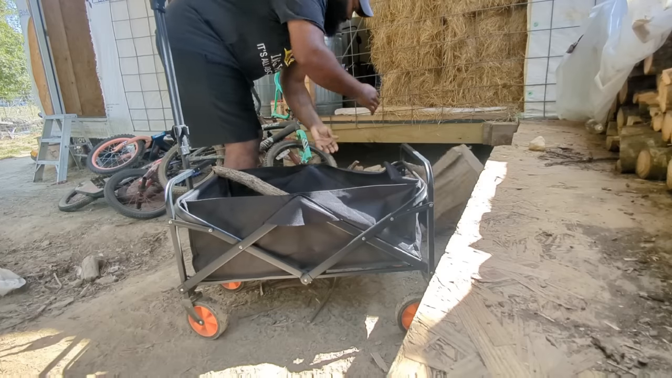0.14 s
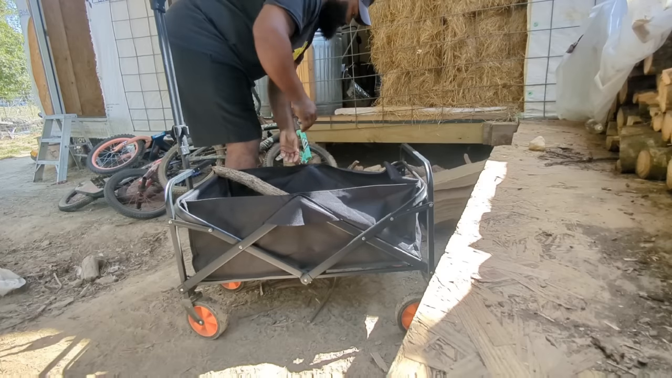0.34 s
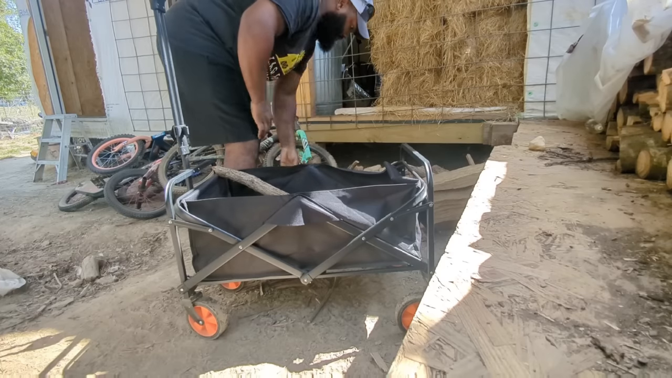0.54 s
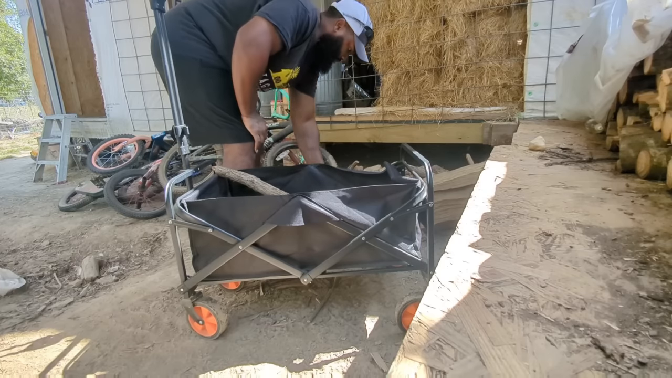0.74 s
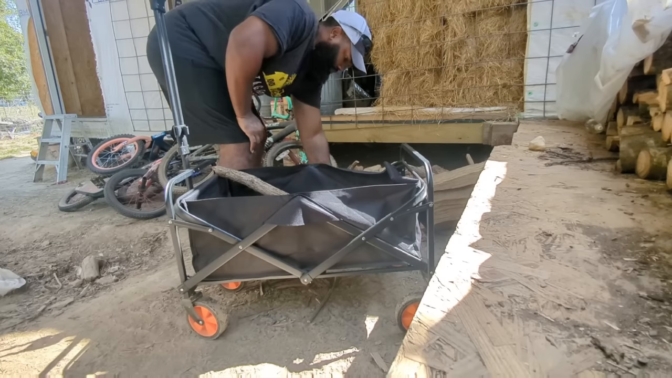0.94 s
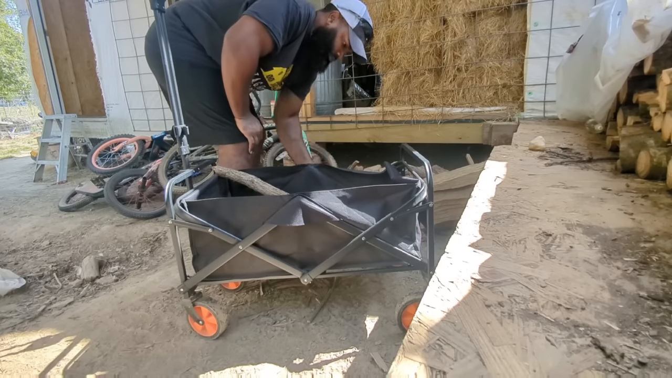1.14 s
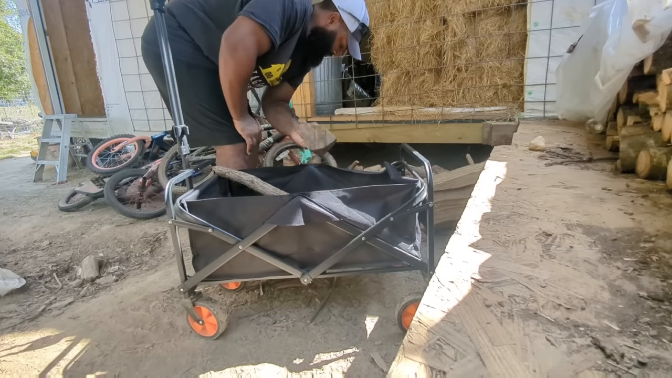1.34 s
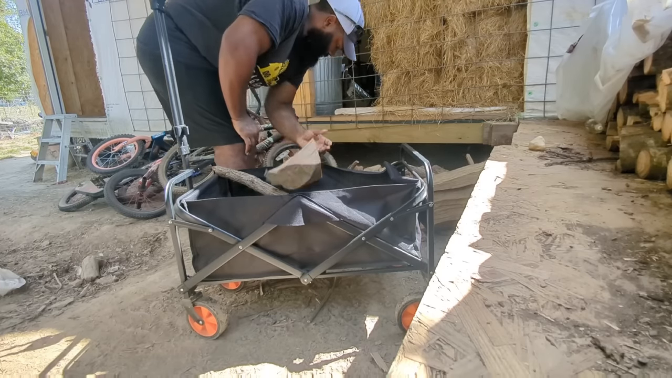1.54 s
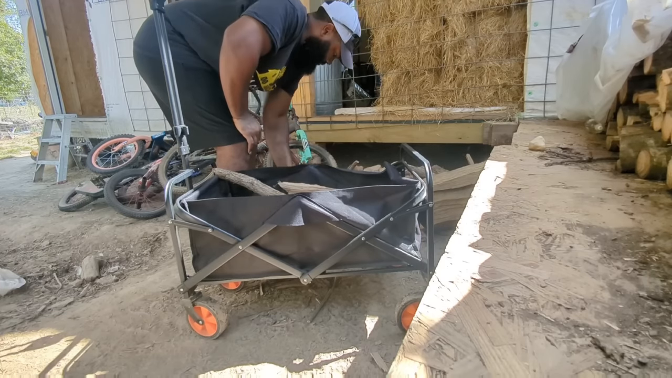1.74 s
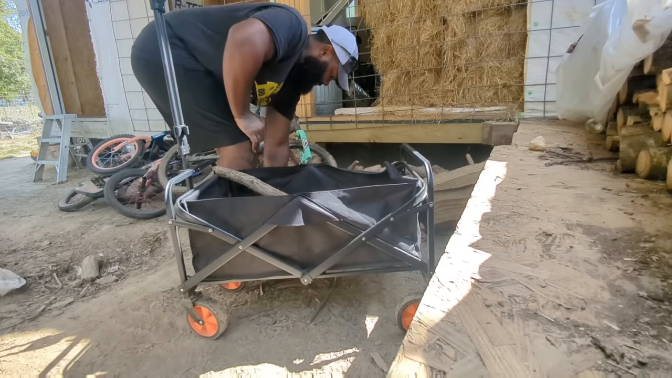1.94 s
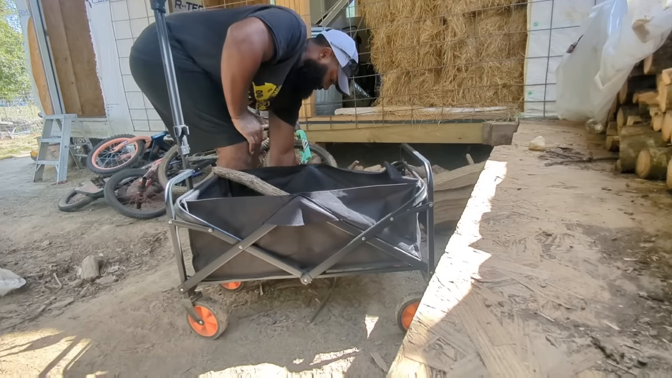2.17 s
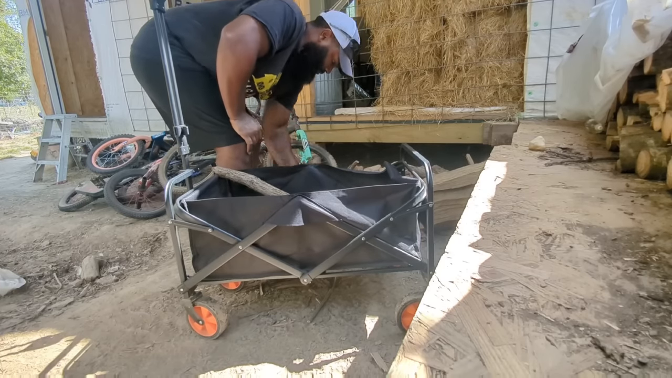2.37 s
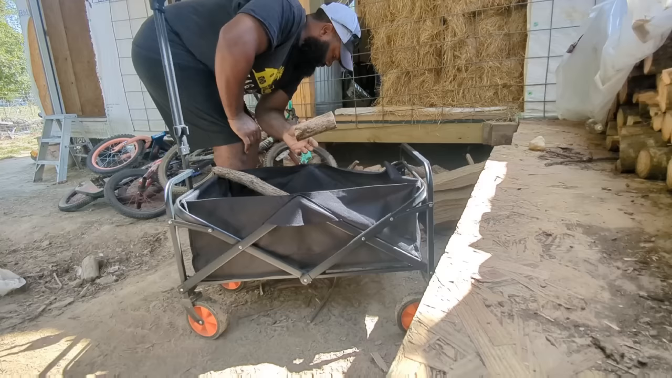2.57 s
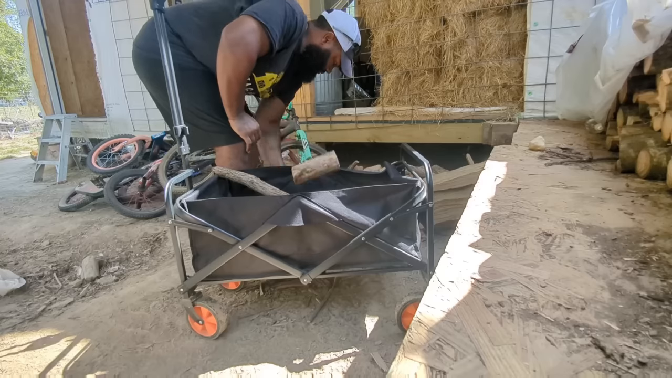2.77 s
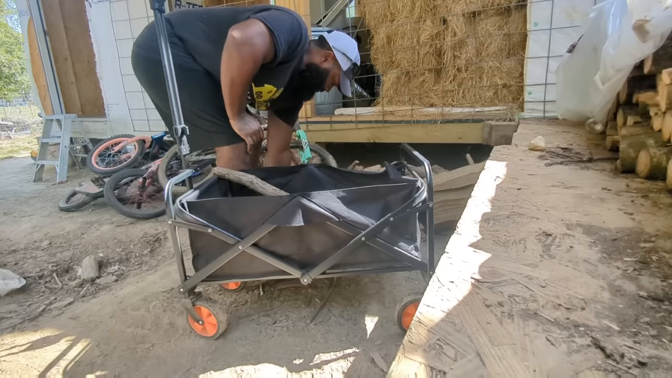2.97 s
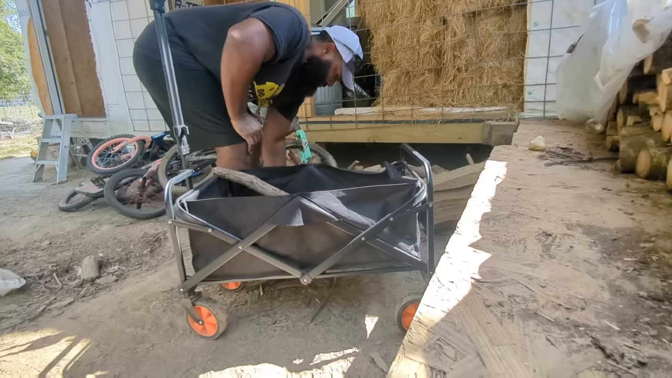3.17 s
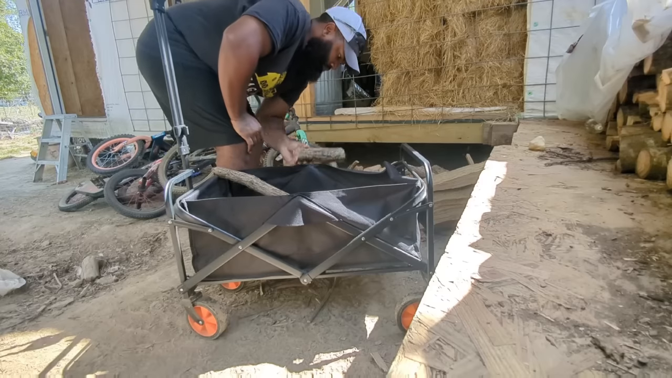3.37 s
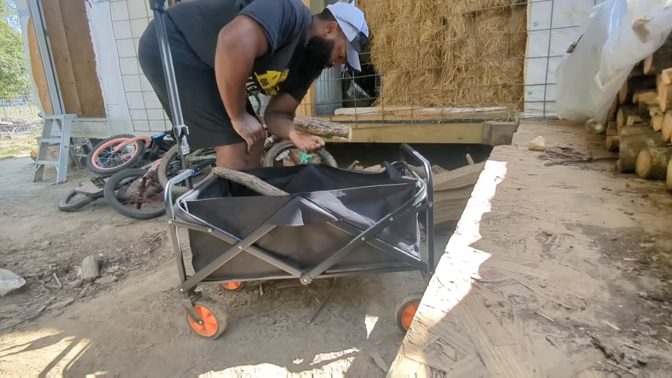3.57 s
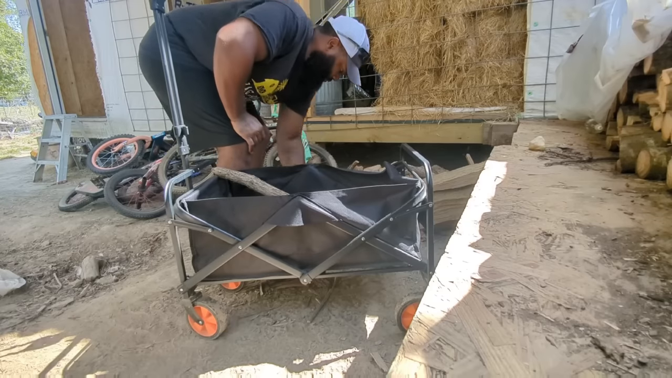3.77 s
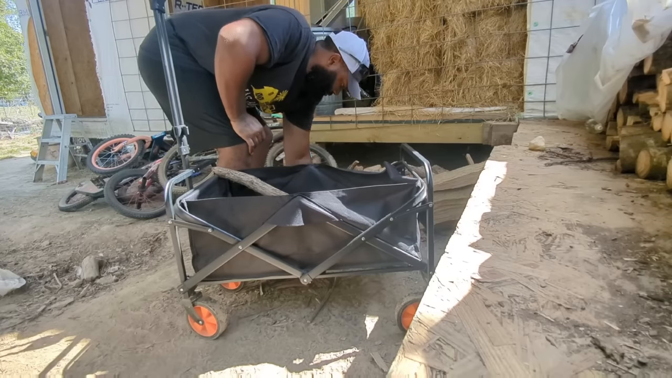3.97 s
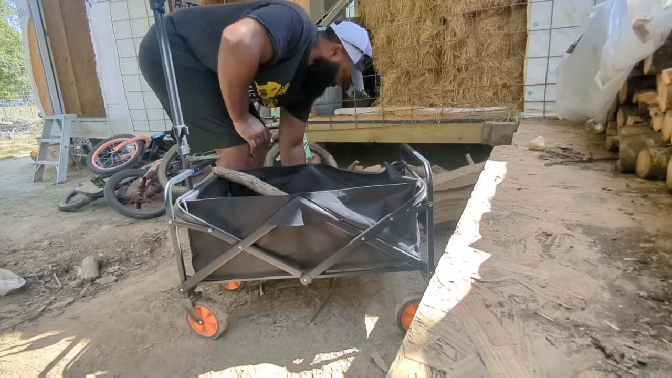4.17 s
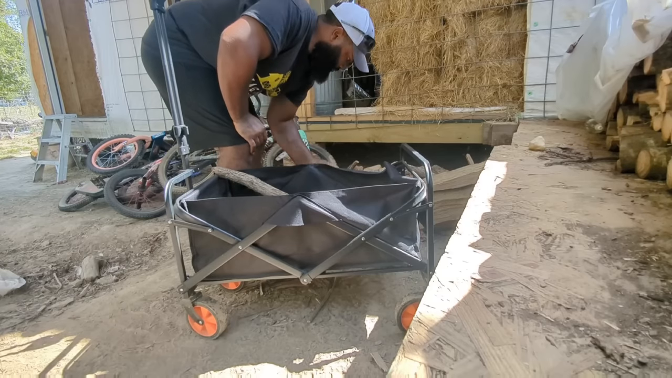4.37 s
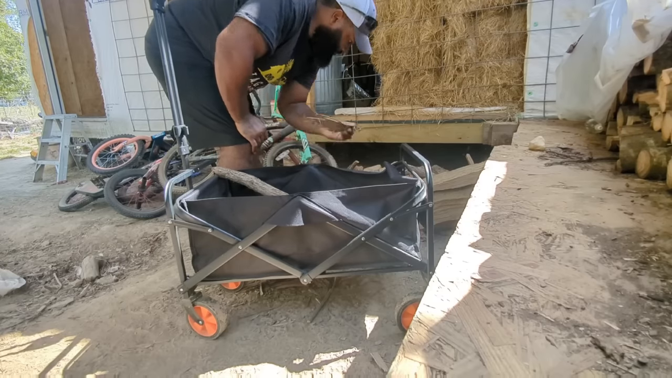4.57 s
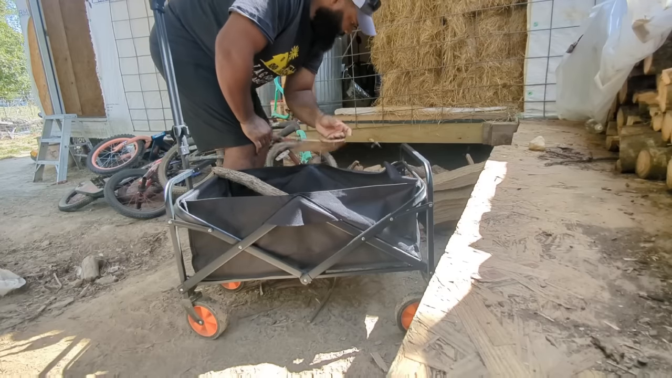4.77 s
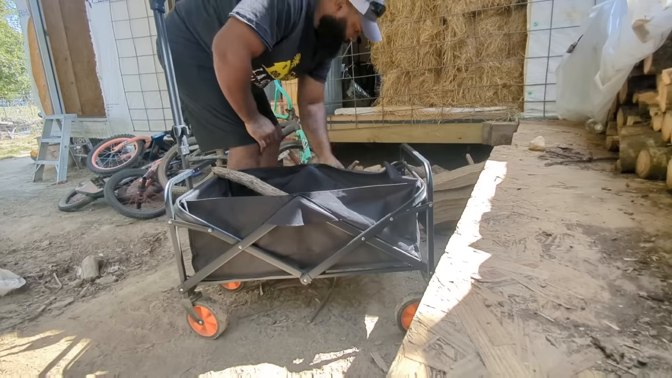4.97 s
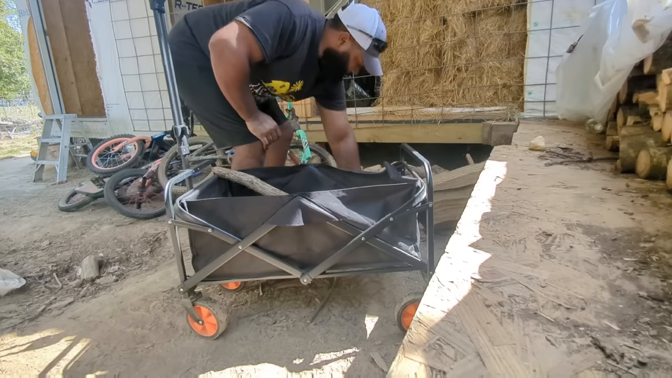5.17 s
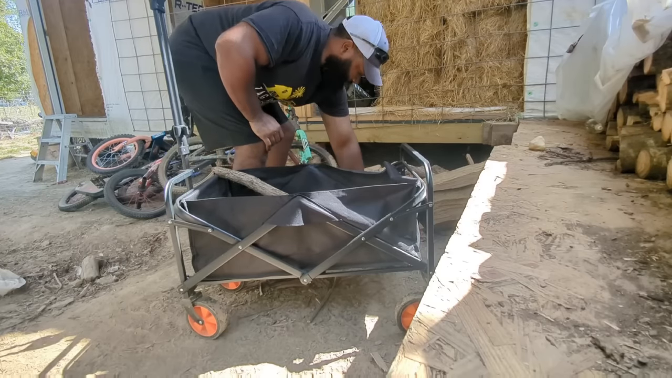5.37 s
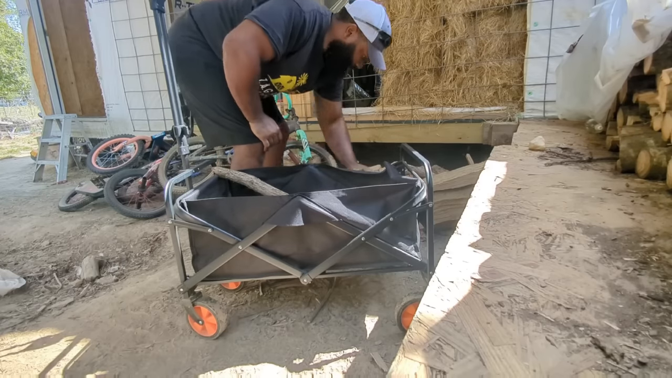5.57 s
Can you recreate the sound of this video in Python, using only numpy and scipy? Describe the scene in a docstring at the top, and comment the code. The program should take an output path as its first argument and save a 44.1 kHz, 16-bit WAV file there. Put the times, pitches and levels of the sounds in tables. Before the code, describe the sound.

Split firewood knocks, scrapes and thuds as it is dropped onto other logs outdoors, with faint birds behind.

```python
"""Split firewood is picked from a pile and dropped onto other logs in a yard, beside a folding wagon.
Each knock is a short chatter of contacts that rings the log and scatters between pile and walls.
Logs drag over each other, bark crunches, and heavy landings boom and sway the load.
A machine hums far off in still air and small birds call."""
import sys
import numpy as np
from scipy import signal
from scipy.fft import rfft, irfft
from scipy.io import wavfile
from scipy.ndimage import uniform_filter1d

SR = 44100
rng = np.random.default_rng(int(sys.argv[2]) if len(sys.argv) > 2 else 0)


def master_out(mix):
    """Clip the mix to full scale and print it as 16-bit PCM to the path in sys.argv[1]."""
    frames = np.transpose(np.atleast_2d(mix))
    ceiling = np.clip(frames, -1, 1)
    pcm = np.round(ceiling * 32767).astype(np.int16)
    wavfile.write(sys.argv[1], SR, pcm)


N = 247842
EVENT_N = SR // 2
EVENT_T = np.arange(EVENT_N) / SR


def amp(db):
    """dB to gain."""
    return 10 ** (np.asarray(db) / 20)


def lookup(table, hz):
    """Interpolates (f/Hz, value) rows over log frequency."""
    f, value = np.transpose(table)
    return np.interp(np.log(hz + 1), np.log(f + 1), value)


def unit_rms(x):
    """Scales to rms 1."""
    return x / np.sqrt(np.mean(x ** 2) + 1e-20)


def burst(x):
    """Scales to the energy of 30 ms at rms 1."""
    return unit_rms(x) * np.sqrt(.03 * SR / x.shape[-1])


def add(mix, start_s, sound):
    """Mixes a sound in at start_s."""
    part = mix[:, max(round(start_s * SR), 0):][:, :sound.shape[-1]]
    part += sound[..., :part.shape[-1]]


def band(x, low_hz, high_hz, order=2):
    """Causal band-pass."""
    return signal.sosfilt(signal.butter(order, [low_hz, high_hz], "band", fs=SR, output="sos"), x)


def convolve(x, response):
    """Per-channel convolution, cut to the input length."""
    return signal.fftconvolve(np.atleast_2d(x), np.atleast_2d(response), axes=1)[:, :x.shape[-1]]


def colour(x, spectrum, size=2048):
    """Minimum-phase filter from (f/Hz, gain/dB) rows."""
    gain_db = lookup(spectrum, abs(np.fft.fftfreq(size, 1 / SR)))
    log_gain = np.log(amp(np.maximum(gain_db, -100)))
    response = np.fft.ifft(np.exp(np.conj(signal.hilbert(log_gain)))).real
    return convolve(x, response)


# diffuse field: f/Hz, left-right coherence
COHERENCE = [(60, .97), (130, .94), (300, .7), (700, .42), (1400, .22), (3000, .08), (15000, .1)]


def diffuse(size):
    """Noise from all sides: left and right alike in the bass, unrelated in the treble."""
    mid, side = rfft(rng.standard_normal((2, size)))
    coherence = lookup(COHERENCE, np.fft.rfftfreq(size, 1 / SR))
    mid *= np.sqrt(1 + coherence)
    side *= np.sqrt(1 - coherence)
    return unit_rms(irfft([mid + side, mid - side], size))


def scatter(direct_db, hold_s, t60_s):
    """Impulse response: direct path plus dense reflections off logs, ground and walls."""
    decay = amp(-60 * np.maximum(EVENT_T - hold_s, 0) / t60_s)
    paths = diffuse(EVENT_N) * decay * (1 - np.exp(-EVENT_T / .0011))
    paths /= np.linalg.norm(paths[0])
    paths[[0, 1], rng.integers(20, 30, size=2)] += amp(direct_db)
    return paths


def grains(size, per_s, spread_db):
    """Sparse, very unequal clicks: fibres slipping and breaking."""
    heights = amp(spread_db * np.minimum(rng.exponential(1, size), 4)) * rng.choice([-1, 1], size)
    return heights * (rng.random(size) < per_s / SR)


# air noise spectrum: f/Hz, relative level/dB
AIR_SPECTRUM = [(12, -45), (20, -38), (40, -5), (64, 3.5), (103, -14.5), (140, -4.5), (166, -16.5),
                (282, -25.5), (306, -28), (362, -28), (1070, -44), (2210, -55.5), (5850, -60), (9130, -56),
                (15500, -63.5)]


def air(level_db=-63.5):
    """Still outdoor air: diffuse noise, its level set above 170 Hz."""
    gain = amp(lookup(AIR_SPECTRUM, np.fft.rfftfreq(N, 1 / SR)))
    noise = irfft(rfft(diffuse(N)) * gain, N)
    return amp(level_db) * noise / band(noise, 170, 15500, order=4).std()


# hum bands: f/Hz, level/dB, width/Hz
HUM_BANDS = [(52.8, -55.5, 25), (126, -63, 21)]


def machine_hum(hz, db, width_hz):
    """One narrow noise band of a distant machine's wavering drone."""
    detune = 2 * (np.fft.rfftfreq(N, 1 / SR) - hz) / width_hz
    return amp(db) * unit_rms(irfft(rfft(diffuse(N)) / (1 + detune ** 4), N))


# rubbed wood: f/Hz, relative level/dB
WOOD_SPECTRUM = [(200, -19), (600, 2), (1600, 3.5), (3000, -0.5), (5000, -32), (10000, -64.5)]
# bright hiss of rubbed and crushed bark, with the microphone's treble peaks: f/Hz, relative level/dB
HISS_SPECTRUM = [(1760, -21.5), (3000, -5.5), (3610, -5.5), (4750, -8), (5340, -6), (5840, -9), (6340, -4),
                 (7380, -8), (9070, -4.5), (9780, -12.5), (10700, -9), (13700, -19.5), (15500, -24)]
# log dragged over log: t/s, length/s, wood/dB, bark/dB
DRAGS = [(0.0, 0.044, -62, -61.5), (0.174, 0.11, -52.5, -58.5), (0.31, 0.066, -40.5, -49.5),
         (0.5, 0.024, -49, -55.5), (0.597, 0.084, -73.5, -78), (1.377, 0.027, -77.5, -72),
         (1.554, 0.023, -75, -79), (1.772, 0.079, -62, -71), (2.2, 0.053, -56.5, -66),
         (2.309, .02, -66, -76), (2.823, 0.091, -83, -94.5), (3.113, 0.19, -75, -84.5),
         (3.478, 0.018, -78.5, -68.5), (4.03, 0.13, -55.5, -62.5), (4.202, 0.033, -52.5, -69),
         (4.262, 0.11, -70, -71.5), (4.32, 0.063, -54, -60.5), (4.386, 0.031, -55, -60),
         (4.455, 0.019, -57.5, -62), (4.933, 0.048, -77, -86), (5.148, 0.045, -70, -73),
         (5.199, 0.047, -56.5, -66.5), (5.38, 0.12, -69, -77.5), (5.548, 0.028, -70.5, -69.5),
         (5.598, .03, -59, -63.5)]


def drags(attack_s=.014, release_db_per_s=299):
    """Sliding logs catch and slip in dense grains; the paths through the pile change as they move."""
    t = np.arange(N) / SR
    slips, power = np.zeros((2, 2, N))
    for k in range(3):
        crossfade = np.sin(np.pi * (5 * t + k / 3))
        clicks = crossfade * grains(N, per_s=2000, spread_db=3.6)
        slips += convolve(clicks, scatter(direct_db=-10, hold_s=.005, t60_s=.06))
    wood = unit_rms(colour(slips, WOOD_SPECTRUM))
    bark = unit_rms(colour(slips, HISS_SPECTRUM))
    attack = np.minimum(EVENT_T / attack_s, 1)
    for start_s, length_s, wood_db, bark_db in DRAGS:
        release = amp(-release_db_per_s * np.maximum(EVENT_T - length_s, 0))
        add(power, start_s, (attack * release * amp([[wood_db], [bark_db]])) ** 2)
    wood_gain, bark_gain = np.sqrt(power)
    return wood_gain * wood + bark_gain * bark


GRAZE_S, CHATTER_S = .008, .0075
# bending modes of a split log: ratio to ring pitch, relative level/dB, t60/s
LOG_MODES = [(0.999, 11.5, .05), (1.19, -11.5, 0.044), (1.88, -7.5, .045), (2.7, -11.5, 0.041),
             (4.401, -21.5, 0.028)]
# log on log: t/s, clack/dB, ring pitch/Hz, then re clack: ring/dB, hollow/dB, crack/dB
KNOCKS = [(0.128, -32, 506, 2, 1.5, 3), (0.14, -28, 453, -3.5, 2, -14.5),
          (0.311, -40.5, 558, -0.5, 6.5, -13), (0.394, -21.5, 1090, -19.5, 1.5, -5.5),
          (0.405, -31, 553, -7, 12, -6), (0.761, -66, 582, 6.5, -6, -10.5),
          (0.874, -69, 396, -5.5, -1, -11), (1.082, -68, 444, -0.5, -11, -4.5),
          (1.113, -67, 395, 4, 12, -8), (1.257, -69.5, 507, 2, 12, -7.5), (1.347, -48, 496, 1, 7.5, -12),
          (1.431, -64.5, 560, 4, 4, -9), (1.714, -40.5, 879, -5, 3, 2), (1.727, -40, 594, -0.5, 7, 1),
          (1.751, -44.5, 925, -0.5, 9, -2.5), (1.875, -38, 1104, -15, -3, -3),
          (1.889, -50, 614, 2, 13.5, -28), (2.02, -35, 590, -11.5, 0.5, -7),
          (2.034, -42.5, 927, 4, 11, 4.5), (2.082, -39, 905, -7.5, 10.5, -8.5),
          (2.209, -62, 1553, -2, 7, -2), (2.999, -42.5, 526, 0, 1.5, -2.5),
          (3.012, -49, 1030, 0, 11.5, 2.5), (3.06, -55.5, 1096, -3.5, 4.5, 1),
          (3.372, -39, 1473, -5.5, 8, -1), (3.377, -39, 506, 8, 12.5, -16.5), (3.47, -61, 390, -4, -2, 1),
          (3.899, -32.5, 608, -33, -5, -22), (3.933, -39.5, 498, -3, 5.5, -2.5),
          (3.975, -31, 519, -6, 1.5, -5), (4.093, -53.5, 1534, 10.5, 5.5, 3.5),
          (4.114, -37.5, 920, -16, -1.5, -7.5), (4.185, -62, 1558, 10.5, 11, 5.5),
          (5.034, -31.5, 557.4, 0.5, -8.5, -3.5), (5.087, -36, 905, -17.5, -3.5, -1.5),
          (5.102, -59.5, 1817, 10.5, 3, 8)]


def knock(clack_db, ring_hz, ring_db, hollow_db, crack_db, rebounds=4):
    """Rough faces graze, then meet in quick contacts that ring the log and the hollows of the pile."""
    hit = round(GRAZE_S * SR)
    contacts = np.zeros(EVENT_N)
    contacts[:hit] = amp(-13.5) * rng.standard_normal(hit) * np.linspace(0, 1, hit) / np.sqrt(hit / 3)
    strengths = rng.uniform(-.42, .55, rebounds)
    contacts[hit + (rng.random(rebounds) * CHATTER_S * SR).astype(int)] = strengths
    contacts[hit] = 1
    blow = convolve(contacts, scatter(direct_db=-7.5, hold_s=.011, t60_s=.11))
    modes = sum(amp(db - 60 * EVENT_T / t60_s) * np.sin(2 * np.pi * ring_hz * ratio * EVENT_T)
                for ratio, db, t60_s in LOG_MODES)
    # soft wood stays in contact too long to excite the highest modes
    ring = amp(ring_db) * burst(band(convolve(blow, modes), 180, 1400))
    clack = burst(band(blow, 560, 1000))
    hollow = amp(hollow_db) * burst(band(blow, 59, 380, order=3))
    crack = amp(crack_db) * burst(band(band(blow, 1400, 2300), 810, 8700))
    return amp(clack_db) * (ring + clack + hollow + crack)


# short wooden rings and sharp cracks: t/s, peak/dB, f/Hz, t60/s
RINGS_AND_CRACKS = [(0.128, -30, 2450, 0.073), (0.130, -24.5, 460, 0.084), (0.130, -16.5, 1300, 0.027),
                    (0.348, -50, 2630, 0.16), (0.4095, -14, 1710, 0.01), (0.4138, -4, 2350, 0.0026),
                    (0.4203, -22.5, 2710, 0.0058), (0.969, -58, 2200, 0.052), (1.347, -40.5, 1014, 0.065),
                    (1.349, -52, 2610, .06), (1.712, -36.5, 5210, 0.065), (2.022, -29, 1553, 0.09),
                    (3.377, -29, 577, 0.045), (3.38, -20.5, 1537, 0.019), (3.422, -44, 2480, 0.06),
                    (4.095, -41.5, 1495, 0.11), (5.093, -25.5, 1536, 0.05), (5.1, -29, 1718, 0.067)]


def vibration(db, hz, rise_s, t60_s):
    """One damped vibration, left and right slightly out of phase."""
    envelope = (1 - np.exp(-(EVENT_T / rise_s) ** 2)) * amp(-60 * EVENT_T / t60_s)
    phase_rad = rng.choice([-1, 1]) * min(hz / 700, .78) * np.array([[-1], [1]])
    return amp(db) * envelope / envelope.max() * np.sin(2 * np.pi * hz * EVENT_T + phase_rad)


# bark crushed at a contact: t/s, level/dB, length/s, treble shelf/dB
CRUNCHES = [(0.132, -39.5, 0.013, -2), (0.393, -35.5, 0.031, -1), (0.408, -55, 0.0029, -14.5),
            (0.4131, -38, 0.0019, 6), (0.439, -55, 0.04, 2), (0.967, -66, 0.023, 8),
            (1.254, -74, 0.0075, -1), (1.342, -71.5, 0.025, -3.5), (1.71, -44.5, 0.017, 0),
            (1.721, -43.5, 0.018, 1), (1.75, -44.5, 0.0092, 6), (1.87, -51.5, 0.036, -1),
            (2.019, -48.5, 0.07, 0), (2.076, -64, 0.0088, 3), (2.992, -49.5, 0.009, -3),
            (3.002, -43.5, 0.014, -8), (3.059, -48, 0.006, 1), (3.069, -49, 0.0091, -7.5),
            (3.368, -48, 0.03, -3), (3.397, -45.5, .004, 4), (3.403, -46, 0.017, 3),
            (3.901, -46.5, 0.004, 3.5), (3.916, -48, 0.051, -1), (3.984, -41.5, 0.013, 6),
            (4.109, -50, 0.018, 3), (5.032, -44, 0.021, 3.5), (5.084, -48.5, 0.02, -3)]


def crunch(db, length_s, brittle_db):
    """Bark breaks in one snap and a spray of smaller ones; the briefest arrive most directly."""
    snaps = grains(EVENT_N, per_s=3500, spread_db=5) * np.exp(-(EVENT_T / length_s) ** 2)
    snaps[0] += 2
    snaps = colour(snaps, [(7000, 0), (13000, brittle_db)])
    direct_db = -10.5 + 5.9 * max(np.log(.063 / length_s), 0)
    paths = scatter(direct_db, hold_s=.0015, t60_s=.11)
    return amp(db) * burst(colour(convolve(snaps, paths), HISS_SPECTRUM))


# modes of the struck spot: ratio to boom pitch, gain/dB, rise/s
BOOM_MODES = [(1, 0.5, 0.0048), (1.75, -26.5, .004)]
# modes of the whole load: ratio to sway pitch, gain/dB, rise/s, t60/s
SWAY_MODES = [(1, 0.5, 0.015, .17), (1.29, -10.5, 0.033, .32), (1.7, -6.5, 0.0073, .16)]
# heavy landings: t/s, boom/dB, boom pitch/Hz, boom t60/s, sway/dB, sway pitch/Hz
THUDS = [(0.137, -22, 151.6, 0.16, -15.5, 73.4), (0.398, -4.5, 188, 0.14, 0, 73.8),
         (1.725, -34, 190, 0.17, -28.5, 74.3), (1.876, -35, 205, 0.12, -32.5, 71),
         (2.026, -31, 184, .13, -28, 61.5), (2.082, -25, 184, 0.19, -36, 69.2),
         (3.006, -30.5, 171, 0.077, -33.5, 73.8), (3.38, -27, 331, 0.16, -36, 91.2),
         (3.906, -45, 200, 0.11, -29, 62), (3.979, -21.5, 222, 0.18, -33, 70.6),
         (4.115, -34.5, 244.3, 0.21, -29, 78)]


def thud(boom_db, boom_hz, boom_t60_s, sway_db, sway_hz, sway_lag_s=.009):
    """A heavy log lands: the spot booms, then the whole load sways at a low, damped pitch."""
    landing = sum(vibration(boom_db + db, boom_hz * ratio, rise_s, boom_t60_s)
                  for ratio, db, rise_s in BOOM_MODES)
    sway = sum(vibration(sway_db + db, sway_hz * ratio, rise_s, t60_s)
               for ratio, db, rise_s, t60_s in SWAY_MODES)
    add(landing, sway_lag_s, sway)
    return landing


# yard decay: f/Hz, t60/s
YARD_DECAY = [(80, 0.25), (300, 0.63), (1000, 0.66), (3000, 0.35), (12000, 0.093)]


def yard_echo(x):
    """The surrounding walls return a short tail, longest in the midrange."""
    hz, t, spectra = signal.stft(diffuse(EVENT_N), SR, nperseg=256)
    envelope = amp(-60 * t / lookup(YARD_DECAY, hz)[:, None]) * (1 - np.exp(-t / .0067))
    _, tail = signal.istft(spectra * envelope, SR, nperseg=256)
    return convolve(x, tail / np.linalg.norm(tail[0]))


# bird notes: t/s, level/dB, length/s, starting pitch/Hz
CHIRPS = [(1.155, -69.5, 0.11, 8530), (1.343, -68.5, 0.089, 8540), (1.573, -67.5, 0.12, 8630),
          (3.787, -59.5, 0.036, 2710), (4.718, -72, 0.091, 8590), (5.124, -66, 0.066, 8400),
          (5.276, -67.5, 0.095, 8420)]


def bird_chirp(db, length_s, start_hz, fall_share=.17):
    """A thin, wavering whistle that bends down, heard mostly through the yard's reflections."""
    progress = np.minimum(EVENT_T / length_s, 1)
    waver = .03 * unit_rms(uniform_filter1d(rng.standard_normal(EVENT_N), size=60))
    hz = start_hz * (1 - fall_share * progress ** 2) * (1 + waver)
    note = np.sin(np.pi * progress ** 1.5) * np.sin(2 * np.pi * np.cumsum(hz) / SR)
    return amp(db) * burst(convolve(note, scatter(direct_db=-2, hold_s=.008, t60_s=.15)))


def scene():
    """Stereo mix; knocks, crunches, rings and cracks feed the yard's faint tail."""
    wood, thuds, birds = np.zeros((3, 2, N))
    for start_s, *row in KNOCKS:
        add(wood, start_s - GRAZE_S, knock(*row) * amp([[.08], [-.08]]))  # left, right/dB
    for start_s, *row in CRUNCHES:
        add(wood, start_s, crunch(*row) * amp([[-1.4], [1.4]]))
    for start_s, db, hz, t60_s in RINGS_AND_CRACKS:
        add(wood, start_s, vibration(db, hz, rise_s=.01 * t60_s, t60_s=t60_s))
    for start_s, *row in THUDS:
        add(thuds, start_s, thud(*row) * amp([[-2], [.3]]))
    for start_s, *row in CHIRPS:
        add(birds, start_s, bird_chirp(*row))
    firewood = wood + amp(-26.5) * yard_echo(wood) + thuds + drags()
    return firewood + birds + air() + sum(machine_hum(*row) for row in HUM_BANDS)


def record(dry):
    """Soft limit at full scale, then a 15.5 kHz low-pass."""
    limited = dry / (1 + dry ** 8) ** (1 / 8)
    low_pass = signal.firwin(401, 15500, window=("kaiser", 8), fs=SR)
    return signal.oaconvolve(limited, low_pass[None], "same")


dry = scene()
out = record(dry)
master_out(out)
```